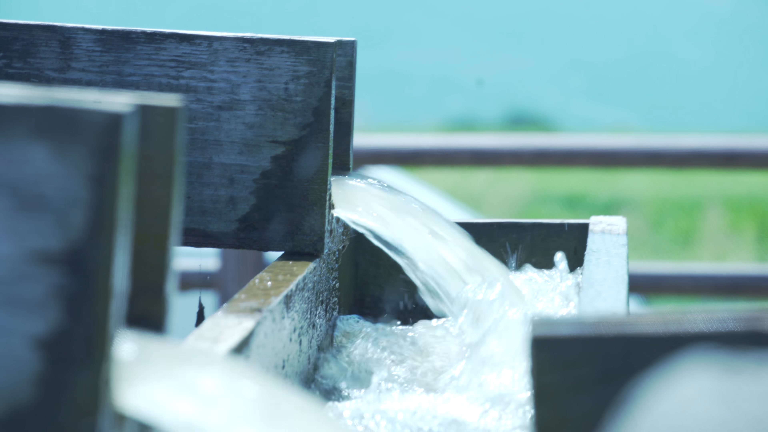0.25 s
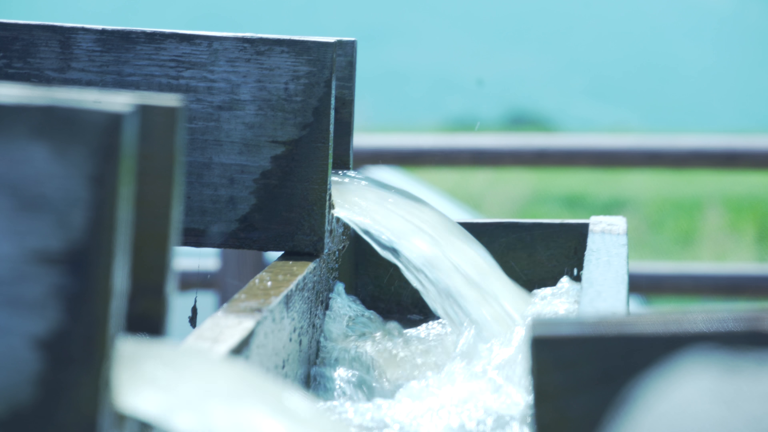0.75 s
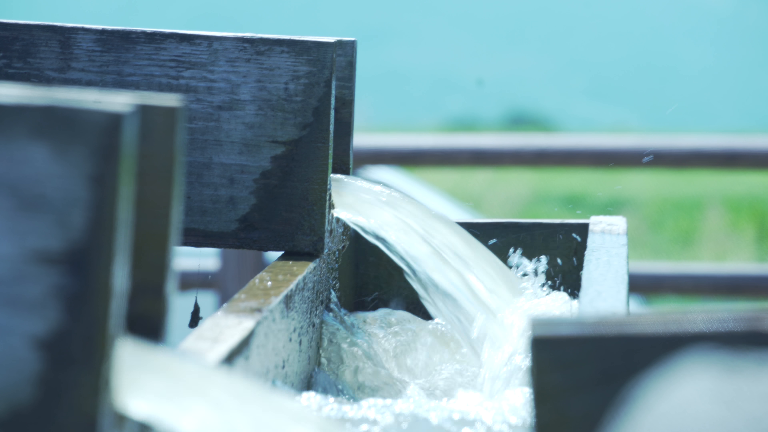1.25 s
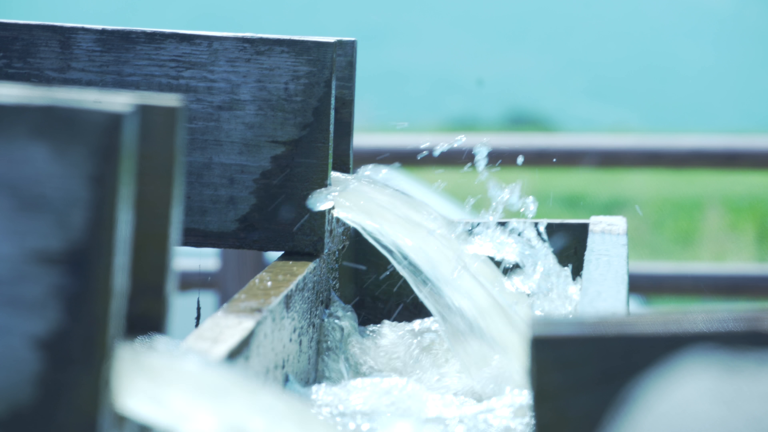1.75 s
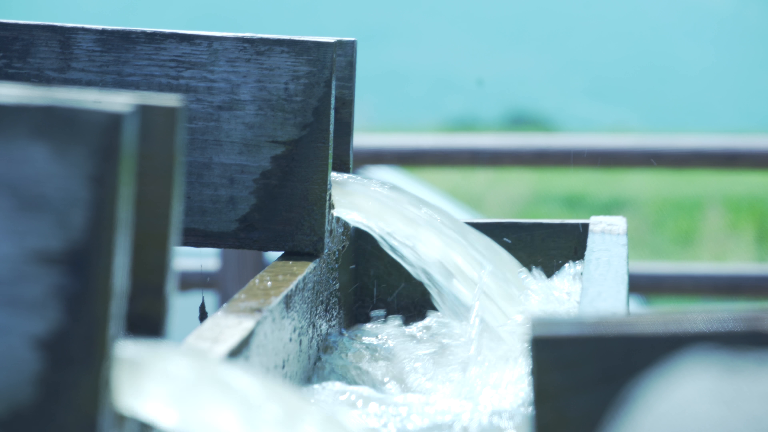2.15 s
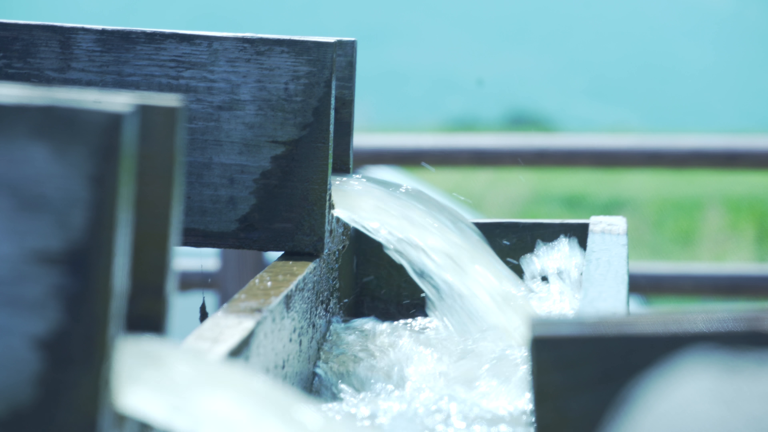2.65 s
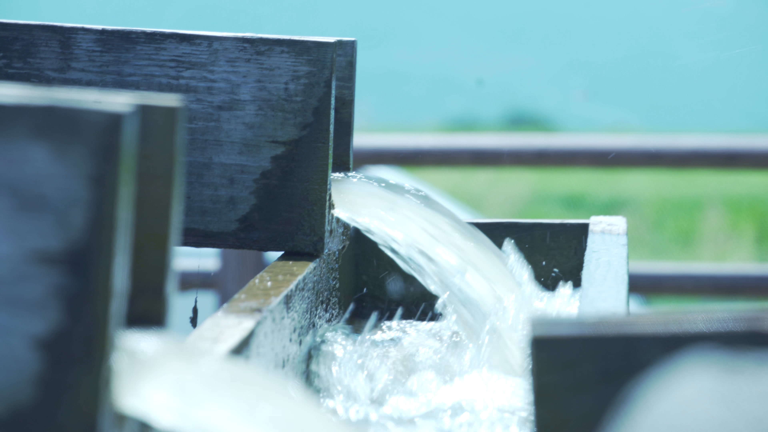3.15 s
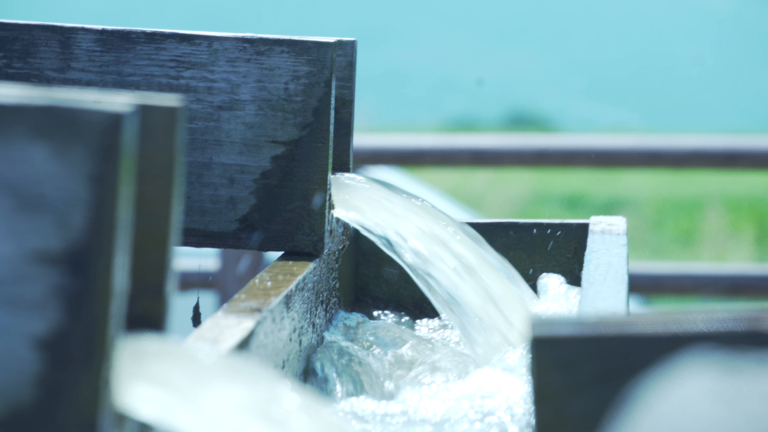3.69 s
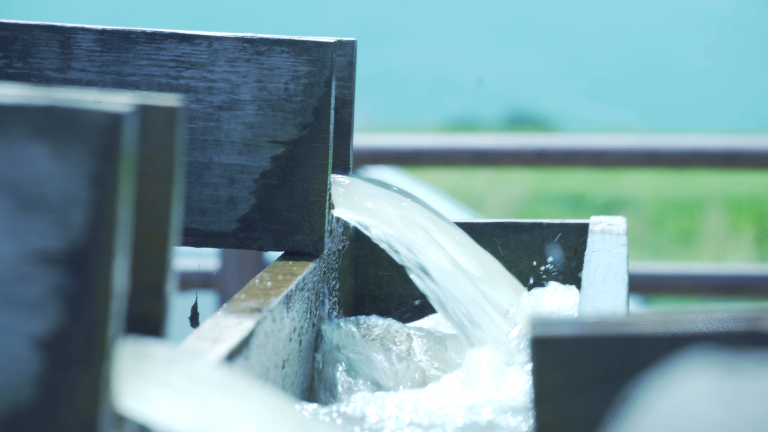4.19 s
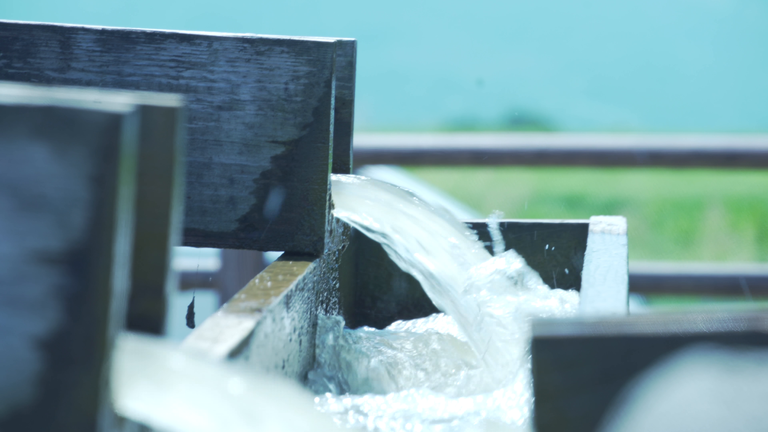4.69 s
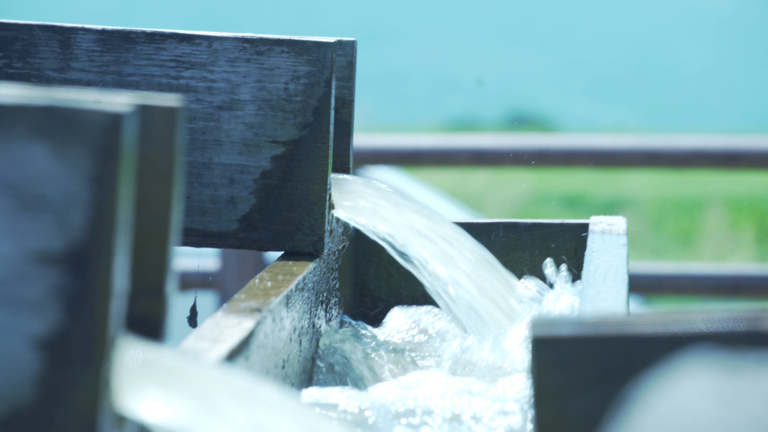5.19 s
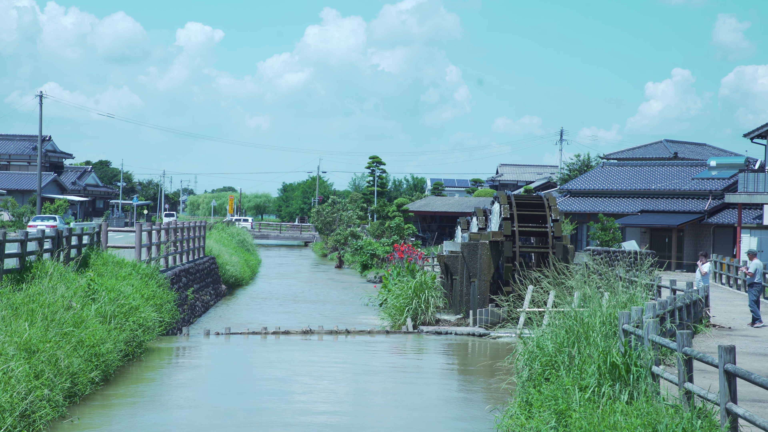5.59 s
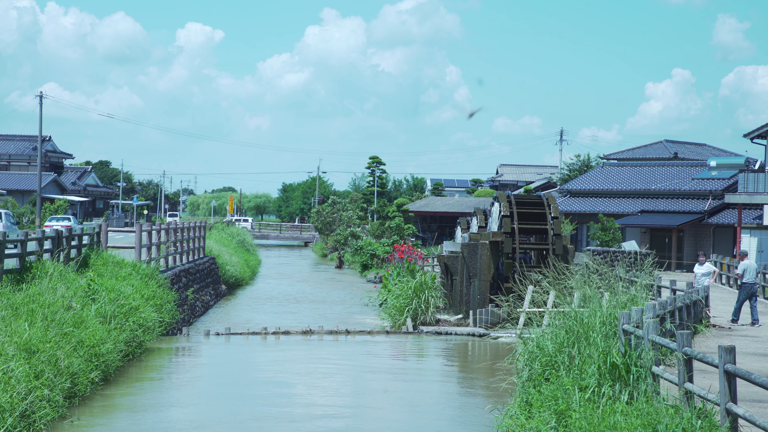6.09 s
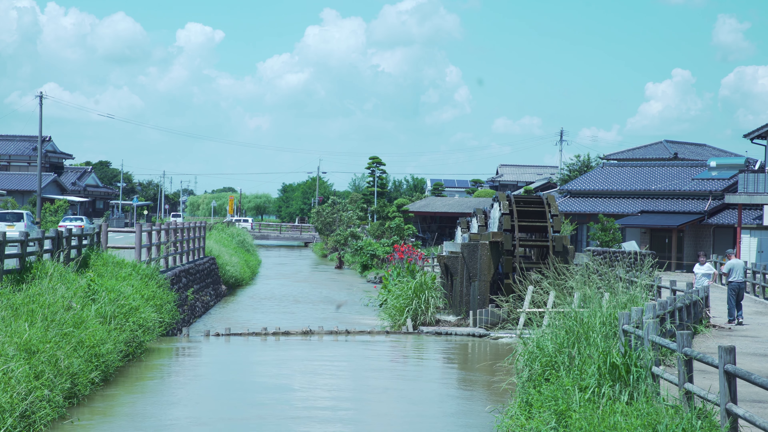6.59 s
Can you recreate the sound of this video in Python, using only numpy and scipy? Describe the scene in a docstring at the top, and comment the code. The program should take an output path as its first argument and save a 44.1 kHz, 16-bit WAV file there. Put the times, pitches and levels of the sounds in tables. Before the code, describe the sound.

A continuous stream splashes into churning water right by the microphone, crisp and bubbly, with fine hissing spray, small swells and occasional gulps of air. It switches abruptly to a more distant view beside the canal: wheel and weir blend into a thicker, darker wash of water, gradually louder, with a barely audible low motor hum beneath. Mono, open air, no obvious echo.

```python
"""A canal-side waterwheel, mono: its wooden buckets pour into a trough, heard close up.
Large bubbles gurgle, jets splash, fine spray hisses: noise, pitch-climbing sines and clicks in three bands.
The stream surges about twice a second, and gulps of air swell the gurgle.
At about 5.5 s we jump to the bank: wheel and weir make a fuller, duller rush of noise and bubbles
that slowly grows over a faint motor hum of three wavering sines."""
import sys
import numpy as np
from scipy import signal
from scipy.fft import rfft, irfft
from scipy.io import wavfile
from scipy.ndimage import uniform_filter1d

SR = 44100
rng = np.random.default_rng(int(sys.argv[2]) if len(sys.argv) > 2 else 0)


def wav_record(signal):
    """Record a signal, one row per channel, as 16-bit PCM in the file named by sys.argv[1]."""
    frames = np.transpose(np.atleast_2d(signal))
    bounded = np.clip(frames, -1, 1)
    # unit amplitude maps onto the largest positive 16-bit level
    quanta = np.round(bounded * 32767).astype(np.int16)
    wavfile.write(sys.argv[1], SR, quanta)


N = 301644
TIME = np.arange(N) / SR  # seconds
FREQS = np.maximum(np.fft.rfftfreq(N, 1 / SR), 1)  # Hz, kept off zero for the logarithms
JUMP_S = 5.478
SPLASH_EDGE_HZ, SPRAY_EDGE_HZ = 700, 3000  # gurgle | splash | spray
CUTOFF_HZ = 15850
SURGE_WIDTH_S, GULP_WIDTH_S = 0.11, 0.028  # standard deviation of each bell-shaped swell

# Tone of the close pour, shaping the spectrum inside each band: f/Hz, level/dB
POUR_COLOUR = [(25, -50), (50, -35), (110, -21.5), (170, -21.5), (200, -15.5), (410, -7), (490, -2.5),
               (720, -2.5), (800, -0.5), (4200, -2.5), (5600, -7.5), (9000, -7.5), (10400, -12),
               (15500, -14)]
# Steady pour into the trough, one row: gurgle level/dB, splash level/dB, spray level/dB
POUR_LEVELS = (-46, -35.5, -34)
# Surges of the stream, throwing up spray: t/s, swell/dB
SURGES = [(0.65, 0.5), (1.21, 1.5), (1.82, 1), (2.44, 0.8), (2.98, 1.1), (3.53, 1.3), (4.15, 1.1),
          (4.63, 0.5), (5.17, 1)]
# How much of a surge's dB swell each band takes, one row: gurgle, splash, spray (plain ratios)
SURGE_SHARES = (0.4, 0.66, 0.67)
# Gulps, where the jet drags down a pocket of air: t/s, swell/dB
GULPS = [(0.35, 1.5), (0.65, 1), (2.39, 2), (2.76, 4), (2.95, 2.2), (3.42, 4.5), (5.05, 3.5)]
# Tone of the rush from the bank, shaping the spectrum inside each band: f/Hz, level/dB
CANAL_COLOUR = [(25, -50), (70, -33), (100, -28), (170, -26), (290, -11), (400, -9.5), (700, -5.5),
                (820, -2), (1200, -1.9), (1750, -5), (3900, -5), (6300, -12.5), (7200, -10.5), (9300, -16),
                (15500, -16.5)]
# The growing rush on the canal: t/s, gurgle level/dB, splash level/dB, spray level/dB
CANAL_LEVELS = [(5.5, -43.5, -32.1, -33.5), (5.95, -41, -32.5, -34.0), (6.03, -40.5, -31, -33.9),
                (6.4, -41.5, -30.5, -33.4), (6.84, -39.2, -30, -31.8)]
# Hum lines of the distant motor, rms before they waver: f/Hz, level/dB
MOTOR_LINES = [(64.6, -72), (129.2, -68.5), (188, -68)]


def from_db(db):
    """Decibels to gain."""
    return 10 ** (np.asarray(db) / 20)


def rms_one(x):
    """Scale to an rms of 1."""
    return x / np.sqrt(np.mean(x ** 2) + 1e-20)


def evened(x, span_s):
    """Ride the fader: hold the running rms over span_s at 1."""
    power = uniform_filter1d(x ** 2, int(span_s * SR))
    return x / np.sqrt(power + 1e-20)


def colour(points):
    """Equaliser gain at every frequency, joined through the points on a log pitch scale."""
    hz, db = np.transpose(points)
    return from_db(np.interp(np.log(FREQS), np.log(hz), db))


def below(edge_hz, order):
    """Smooth low-pass gain at every frequency; a higher order cuts more steeply."""
    return .5 - .5 * np.tanh(order * np.log(FREQS / edge_hz))


def drift(rate_hz):
    """Slow random wander with a spread of 1: noise through a two-pole low-pass."""
    step = 40  # samples between wander points
    pole = np.exp(-2 * np.pi * rate_hz * step / SR)
    noise = rng.standard_normal(N // step + 2002)
    settled = signal.lfilter([1], [1, -2 * pole, pole * pole], noise)[2000:]
    return np.interp(np.arange(N) / step, np.arange(len(settled)), rms_one(settled))


def swells(rows, width_s):
    """A smooth rise and fall in dB around each event."""
    return sum(db * np.exp(-.5 * ((TIME - s) / width_s) ** 2) for s, db in rows)


def impacts(per_s, size_db):
    """Drops strike the surface at random moments: sharp kicks of either sign, mostly small."""
    loudness_db = size_db * np.minimum(rng.exponential(1, N), 4)
    sizes = from_db(loudness_db) * rng.choice([-1, 1], N)
    struck = rng.random(N) < per_s / SR
    return rms_one(sizes * struck)


def bubble(hz, cycles, rise):
    """One bubble: a sine dying by 60 dB, its pitch climbing by the share `rise` as it nears the surface."""
    life_s = cycles / hz
    age = np.arange(int(life_s * SR) + 2) / SR
    turns = hz * age * (1 + .5 * rise * age / life_s)
    return np.sin(2 * np.pi * turns) * from_db(-60 * age / life_s)


def bubbles(per_s, cycles, rise, size_db, count=32):
    """A swarm of bubbles, even in power per Hz; the small, high ones are the most numerous."""
    pitches = np.geomspace(170, 14000, count)  # Hz
    shares = pitches / pitches.sum()
    kicks = impacts(per_s, size_db)
    dealt = rng.choice(count, N, p=shares)  # which pitch a kick sets ringing
    out = np.zeros(N)
    for k, hz in enumerate(pitches):
        ringing = signal.oaconvolve(kicks * (dealt == k), bubble(hz, cycles, rise))[:N]
        out += np.sqrt(shares[k]) * rms_one(ringing)
    return rms_one(out)


def water(grains, points, levels, slosh_db, flutter_db, flutter_hz):
    """Gurgle, splash and spray slosh together, and each flutters faster on its own as the stream breaks up."""
    spectrum = rfft(grains) * colour(points)
    low = below(SPLASH_EDGE_HZ, order=5)
    not_high = below(SPRAY_EDGE_HZ, order=5)
    slosh = slosh_db * drift(13)  # shared by all three bands
    out = np.zeros(N)
    for band, level_db in zip([low, not_high - low, 1 - not_high], levels):
        flutter = flutter_db * drift(flutter_hz)  # each band's own
        shaken = irfft(spectrum * band, N) * from_db(slosh + flutter)
        out += evened(shaken, span_s=0.52) * from_db(level_db)
    return out


def pour_levels():
    """Band levels in dB: steady flow, lifted by each surge; gulps lift only the gurgle."""
    surge = swells(SURGES, SURGE_WIDTH_S)
    gurgle, splash, spray = [db + share * surge for db, share in zip(POUR_LEVELS, SURGE_SHARES)]
    return gurgle + swells(GULPS, GULP_WIDTH_S), splash, spray


def pouring():
    """Close jets: bubbles and drop ticks stand out a little from a noise wash of countless tiny ones."""
    wash = from_db(1.2) * rng.standard_normal(N)
    plops = bubbles(per_s=24000, cycles=18.0, rise=0.073, size_db=2.5)
    ticks = from_db(-6.0) * impacts(per_s=3000, size_db=1.5)
    return water(wash + plops + ticks, POUR_COLOUR, pour_levels(),
                 slosh_db=0.39, flutter_db=0.3, flutter_hz=22)


def canal_levels():
    """Band levels in dB: the body of the rush grows first, the spray follows late."""
    s, *columns = np.transpose(CANAL_LEVELS)
    return [np.interp(TIME, s, db) for db in columns]


def canal():
    """Wheel and weir from the bank: distance blends the bubbles into a smoother rush."""
    wash = from_db(2.0) * rng.standard_normal(N)
    plops = bubbles(per_s=30000, cycles=17, rise=0.088, size_db=2.0)
    return water(wash + plops, CANAL_COLOUR, canal_levels(),
                 slosh_db=0.18, flutter_db=-0.13, flutter_hz=25)


def motor():
    """A low hum whose lines waver in level and phase on their way through the open air."""
    hum = np.zeros(N)
    for hz, db in MOTOR_LINES:
        level = from_db(db + 2.2 * drift(4))
        phase = 2 * np.pi * hz * TIME + 0.4 * drift(3)
        hum += level * np.sin(phase)
    return np.sqrt(2) * hum  # rms to peak


def scene():
    """The close pour drops away as the bank fades in; both channels are alike."""
    near = np.clip((JUMP_S - TIME) / 0.015 + .5, 0, 1)
    far = np.sqrt(np.clip((TIME - JUMP_S + 0.005) / 0.042, 0, 1))
    mono = near * pouring() + far * (canal() + motor())
    return np.array([mono, mono])


def record(dry):
    """A steep low-pass cuts the top."""
    return irfft(rfft(dry) * below(CUTOFF_HZ, order=200), N)


dry = scene()
out = record(dry)
wav_record(out)
```